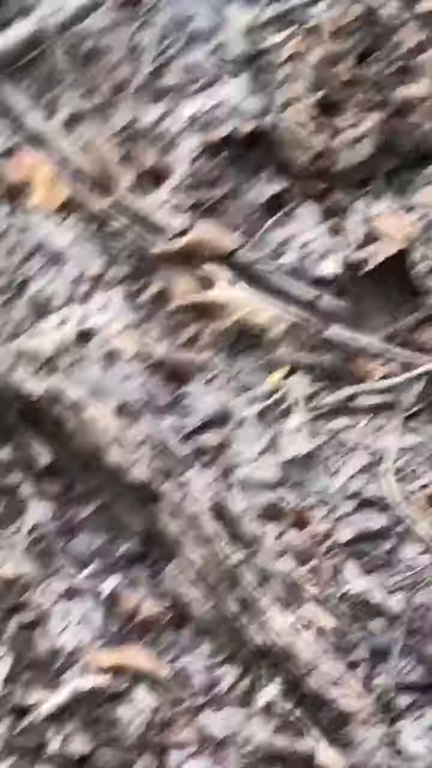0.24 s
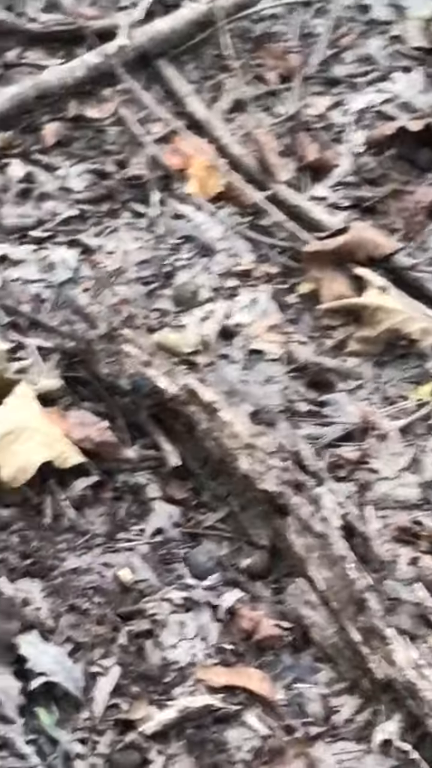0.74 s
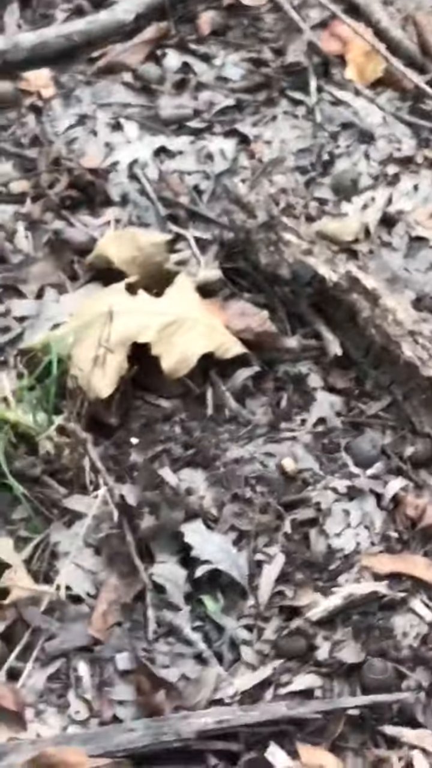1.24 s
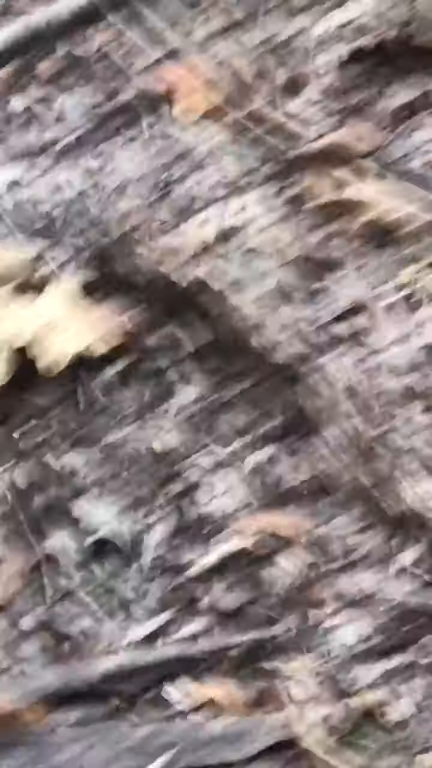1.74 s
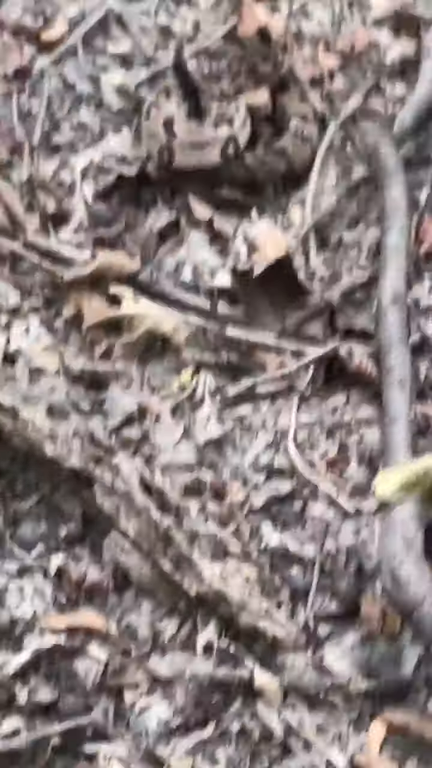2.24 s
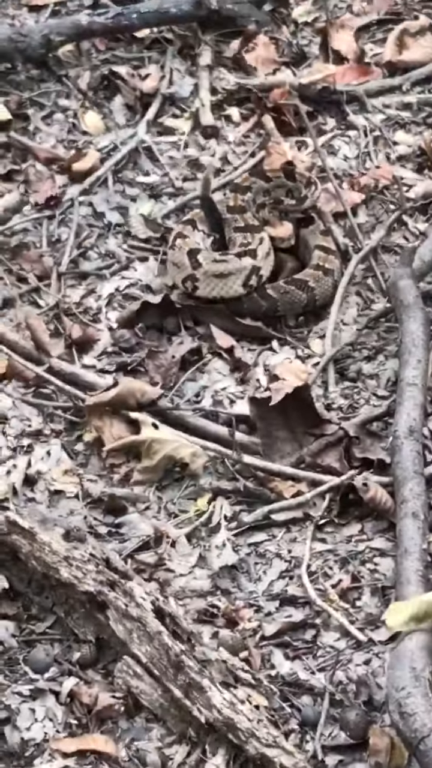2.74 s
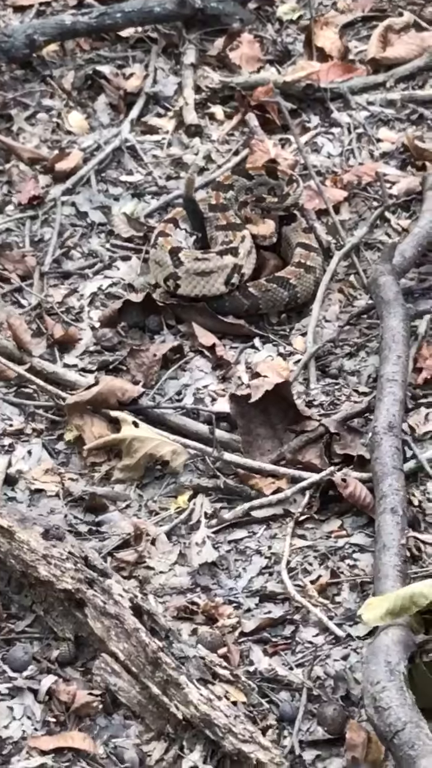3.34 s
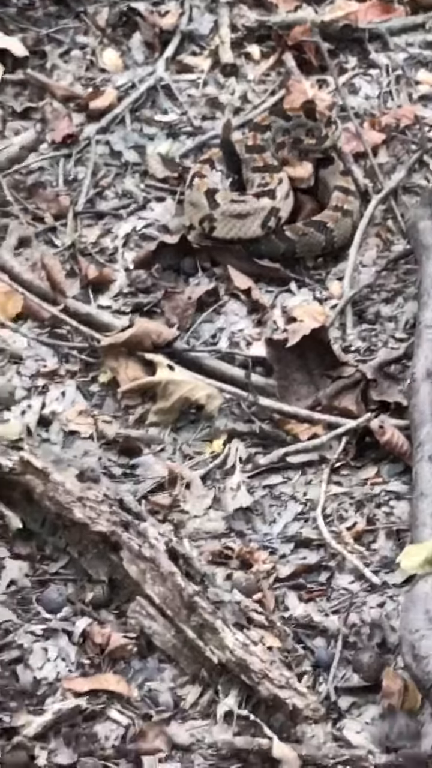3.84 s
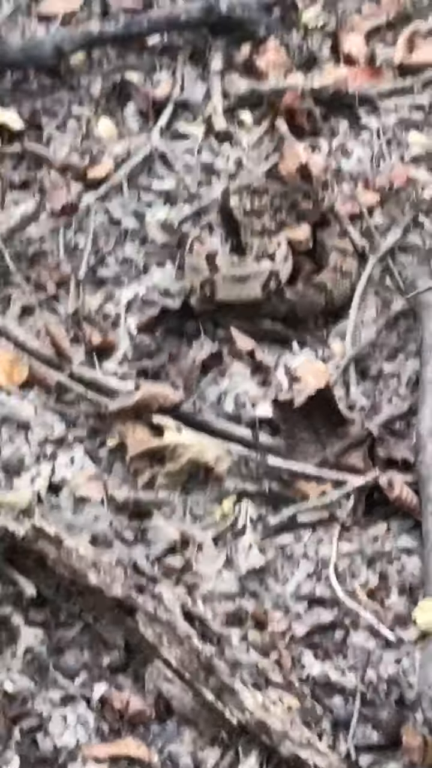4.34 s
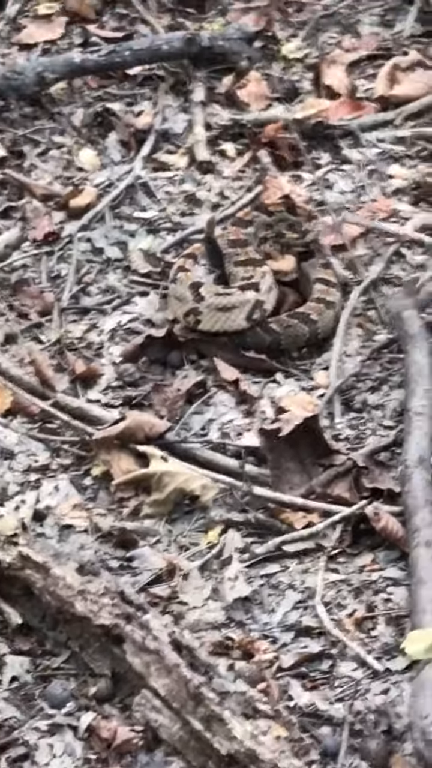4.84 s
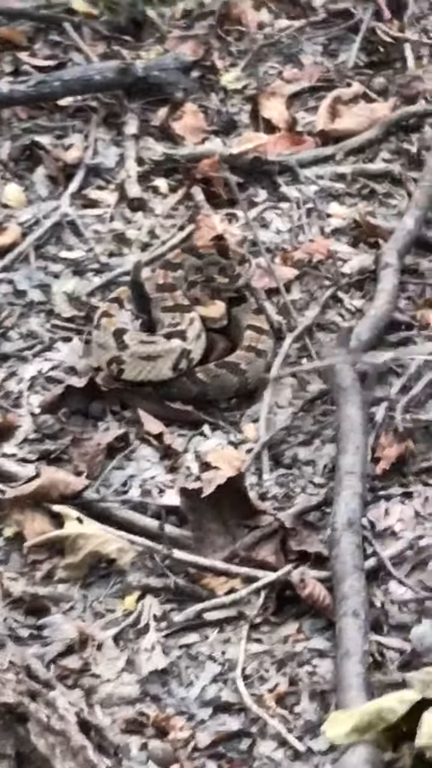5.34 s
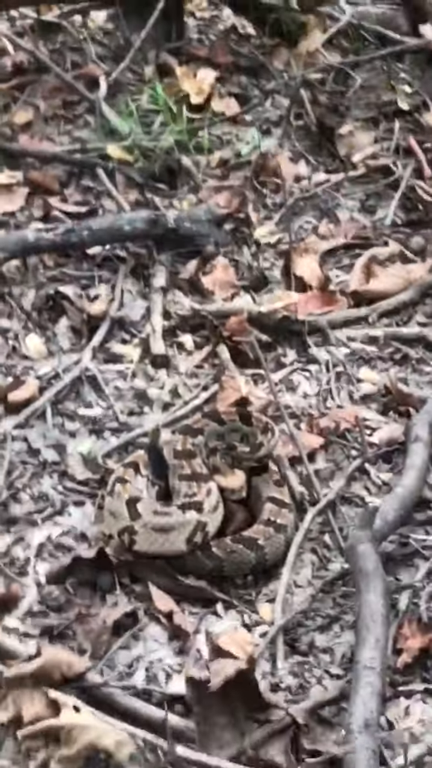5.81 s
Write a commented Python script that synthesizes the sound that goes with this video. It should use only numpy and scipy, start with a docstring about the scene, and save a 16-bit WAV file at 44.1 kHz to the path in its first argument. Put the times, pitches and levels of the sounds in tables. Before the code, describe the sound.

Crisp leaf litter snaps and scrapes underfoot, a single sizzling rattlesnake buzz swells and dies, and crunching footfalls return over faint insects.

```python
"""At first dry leaves and twigs snap, scrape and rustle close by: impulses ring in leaf, wood and soil.
From 1.2 to 3.4 s a coiled rattlesnake buzzes once: hollow tail segments, knocked at each swing, resonate.
Duller crunches and knocks accompany the buzz; sparse rustling follows, then denser snapping to the end.
Throughout, filtered noise makes a low rumble, wavering low tones and a far, narrow-band insect chorus."""
import sys
import numpy as np
from scipy import signal
from scipy.fft import rfft, irfft
from scipy.io import wavfile
from scipy.ndimage import uniform_filter1d

SR = 44100
rng = np.random.default_rng(int(sys.argv[2]) if len(sys.argv) > 2 else 0)


def digitize_waveform(pressure):
    """Quantize a signal to 16-bit integers and store it at the path in sys.argv[1].

    Rows of a 2-D input are taken as channels; values are limited to [-1, 1].
    """
    field = np.atleast_2d(pressure).T
    bounded = np.clip(field, -1, 1)
    quanta = np.round(bounded * 32767).astype(np.int16)
    wavfile.write(sys.argv[1], SR, quanta)


N = 267687   # samples

# Loudness curve of the buzz. Columns: time_s, level_db
BUZZ_LEVEL = [(1.2, -75), (1.27, -43.5), (1.37, -34.5), (1.88, -30.5), (2.68, -32.5), (3.19, -38),
              (3.36, -49.5), (3.4, -86)]
# Rate of tail swings, one each way. Columns: time_s, swings_per_s
TAIL_SWINGS = [(1.2, 160), (1.5, 150), (2.3, 145), (3.4, 107)]
# Segment resonances. Columns: pitch_hz, width_hz, bunching_depth (0-1),
# facing_db (gain before the root-width weight), facing_s (moment of facing the listener)
SEGMENTS = [(3310, 470, 0.3, -3.5, 2.98), (4280, 560, 0.5, -3, 1.08), (4700, 370, 0.8, -5.5, 2.93),
            (5540, 420, 0.46, 0, 2.1), (6200, 480, 0.8, 3, 3.27), (7040, 560, 1, 1.5, 2.19),
            (7520, 450, .9, -1, 2.3), (8250, 280, 0.63, 0.5, 2.9), (8800, 1200, 0.4, -3.5, 2.34),
            (9440, 320, 0, -3.5, 2.1), (9970, 550, 0.4, -3.5, 2.9), (11100, 480, 0, -11, 2.6),
            (12400, 710, 0.3, -4, 2.6), (14200, 2000, 0.2, -8, 2.73), (14900, 1500, .4, -8, 2.44)]
# Leaves and twigs breaking. Columns: break_s, snap_peak_db, snap_hz, treble_peak_db, knock_peak_db, knock_hz
CRACKS = [(0.02, -34.5, 4200, -46, -43, 1670), (0.0785, -23, 3100, -41, -33, 1550),
          (0.0854, -33, 3500, -43, -30, 1900), (0.1136, -27, 3720, -38, -48, 1660),
          (0.192, -32, 5110, -37, -60, 1340), (0.207, -25, 4600, -31, -28.5, 1550),
          (0.2285, -13, 6260, -24, -21, 1820), (0.2489, -30, 5580, -48, -32, 1450),
          (0.2672, -29, 4870, -40, -60, 1640), (0.2783, -13.5, 5260, -11.5, -26.5, 1320),
          (0.289, -28, 3700, -48, -42, 1900), (0.296, -26, 4930, -30, -39, 1930),
          (0.31, -22, 2800, -15.5, -20, 1900), (0.353, -33, 6190, -43, -57, 1100),
          (0.3853, -30, 3900, -48, -60, 1240), (0.396, -28, 4250, -39, -29.5, 1670),
          (0.426, -32, 3250, -46, -37, 1380), (0.46, -27.5, 3800, -24, -62, 1030),
          (0.5122, -32.5, 5000, -47, -39, 816), (0.559, -36, 6070, -45, -58, 1540),
          (0.6083, -36, 4360, -41, -47, 1520), (0.628, -32.5, 3850, -29.5, -42, 1460),
          (0.646, -29.5, 5100, -41, -55, 1420), (0.7142, -36.5, 6200, -41, -46, 1930),
          (0.828, -32, 3150, -27.5, -33.5, 1110), (0.8432, -35.5, 4560, -53, -42, 1750),
          (0.96, -38, 3600, -36, -49, 2200), (0.982, -42, 4720, -50, -62, 1100),
          (1.0256, -31, 5970, -37, -53, 1360), (1.0448, -21, 5050, -34, -29, 2260),
          (1.08, -21, 4800, -15.5, -28.5, 1520), (1.1025, -27.5, 5230, -43, -30, 1700),
          (1.1238, -32, 5930, -43, -31.5, 2260), (1.143, -28, 3400, -44, -29.5, 820),
          (1.1623, -23, 4440, -40, -25.5, 1550), (1.178, -20, 5300, -20.5, -54, 1870),
          (1.2024, -34, 3740, -43, -63, 1440), (1.2207, -31, 5500, -37, -44, 1960),
          (1.2349, -26.5, 4700, -39, -44, 1330), (1.2587, -21, 5800, -36, -53, 1790),
          (1.282, -27.5, 2800, -49, -52, 2410), (1.3852, -16, 4550, -45, -59, 2240),
          (1.6304, -39, 2980, -56, -31, 655), (1.6791, -23.5, 3000, -47, -24, 920),
          (1.7838, -42, 3000, -57, -36, 1100), (1.8285, -48, 3010, -58, -36, 1050),
          (1.8666, -29, 3020, -44, -24.5, 870), (2.0326, -55, 3000, -61, -37, 1690),
          (2.069, -47, 3000, -57, -33, 915), (2.1196, -40, 3000, -48, -27, 1420),
          (2.2795, -48, 3000, -58, -36, 1330), (2.332, -9.5, 4274, -32, -58, 2070),
          (2.3392, -50, 3000, -60, -32, 1280), (3.0768, -53, 3000, -63, -40, 1050),
          (3.1596, -53, 3000, -63, -42, 820), (3.2882, -40, 4580, -30, -36, 1260),
          (3.4717, -48, 4850, -64, -65, 1090), (3.5179, -44, 5700, -60, -65, 740),
          (3.606, -61, 2800, -66, -52, 1500), (3.537, -46, 6060, -59, -56, 830),
          (4.1466, -38, 5220, -48, -60, 1240), (4.1742, -35, 4060, -43, -40, 1690),
          (4.2077, -31, 4500, -46, -58, 2380), (4.2445, -44, 6220, -56, -59, 590),
          (4.3642, -36, 6330, -51, -65, 1850), (4.374, -39, 5050, -31.5, -44.5, 1620),
          (4.503, -42.5, 5030, -55, -53.5, 1220), (4.784, -46, 5800, -56, -65, 1200),
          (4.826, -43, 5000, -38, -58, 800), (4.8384, -39, 4100, -39, -43, 1580),
          (4.8987, -30, 6100, -47, -65, 1090), (5.021, -32, 6320, -57, -62, 1510),
          (5.192, -28, 5600, -42, -35.5, 1440), (5.2011, -28.5, 3300, -40, -31, 2260),
          (5.2533, -50, 5060, -50, -38.5, 1180), (5.277, -38, 5300, -43, -52, 1890),
          (5.3, -32, 4250, -42, -49, 1590), (5.3103, -29.5, 4300, -54, -60, 1850),
          (5.354, -25.5, 2730, -37, -27.5, 1500), (5.405, -30, 2740, -46, -48, 2290),
          (5.4168, -26, 4900, -42, -51, 1990), (5.5238, -21, 5100, -37, -22, 1420),
          (5.5998, -27.5, 4540, -24.5, -32, 1630), (5.6232, -29.5, 3870, -25, -47, 2230),
          (5.64, -44, 3710, -46, -33.5, 1390), (5.684, -22.5, 5330, -46, -31.5, 1520),
          (5.709, -38, 4780, -41, -45, 1430), (5.7922, -27.5, 4500, -26, -36, 2130),
          (5.804, -41, 3600, -37, -49, 1950), (5.8248, -37, 2800, -52, -23, 2250),
          (5.8307, -30, 2800, -49, -22, 2270), (5.847, -40, 3300, -37, -29, 1630),
          (5.89, -49, 3600, -55, -34.5, 1190), (5.911, -38, 4010, -30, -60, 2280),
          (6.0124, -34.5, 3280, -34, -33, 1630)]
# Leaves crushed or dragged; levels are rms before the envelope.
# Columns: start_s, hold_s, body_db, body_hz, treble_db, low_db
SCUFFS = [(.018, 0.01, -50, 3960, -51, -65), (.073, 0.032, -40.5, 3230, -38.5, -50),
          (.11, .027, -45, 3500, -53, -49.5), (.168, 0.033, -59, 6500, -46.5, -57.5),
          (.205, 0.017, -50, 4200, -37.5, -47.5), (.29, 0.0022, -64, 3980, -49, -54),
          (1.035, 0.012, -60, 4500, -45.5, -69), (1.275, 0.0088, -43.5, 2700, -46, -54),
          (2.262, 0.04, -50.5, 1530, -64, -51.5), (2.328, 0.033, -52, 1810, -62, -49.5),
          (2.725, 0.003, -68, 696, -75, -61), (3.748, 0.015, -71, 6500, -65.5, -68),
          (3.96, 0.1, -73, 5500, -63.5, -85), (4.15, .035, -54, 5500, -71, -68),
          (4.2, 0.015, -57, 4430, -52, -61), (4.369, 0.0039, -67, 4000, -57, -76),
          (4.824, 0.0065, -79, 5000, -54, -73), (4.897, .012, -48, 4100, -67, -63),
          (5.188, .016, -52, 3500, -45, -53), (5.402, 0.027, -45.5, 3500, -62, -78),
          (5.495, .033, -47, 3000, -56, -58), (5.819, 0.012, -34.5, 2330, -71, -43),
          (5.842, 0.025, -45.5, 2420, -43, -56), (5.885, 0.03, -52, 2970, -49.5, -57)]
# Feet in the litter, as gain curves. Columns: time_s, rustle_db, crunch_db, treble_db (added to the rustle)
LITTER_LEVELS = [(0.0, -56, -66, 7), (0.114, -47.5, -53, 3), (0.496, -52, -55.5, 8.5),
                 (0.63, -62.5, -64, 10), (0.936, -65, -66.5, 7), (1.082, -54.5, -61, 3),
                 (1.22, -47, -54.5, 6), (1.65, -56, -50.5, -12), (2.25, -52, -55.5, -11),
                 (2.83, -58, -64.5, -9), (3.3, -61, -67, -5), (3.49, -74, -77.5, 6), (4.01, -75, -74, 4),
                 (4.2, -55, -64.5, 4.5), (4.47, -73, -75.5, 4.5), (4.9, -59, -64, 2),
                 (5.12, -49.5, -57.5, 3.5), (5.4, -52, -56, 8.5), (5.74, -52.5, -60, 2.5),
                 (5.91, -57, -57, 10), (6.07, -55.5, -61.5, 5)]
# Relative spectrum of the rustle. Columns: frequency_hz, gain_db
RUSTLE_SPECTRUM = [(1200, -22), (2000, -29), (3000, 4), (4500, 6.5), (7000, 4.5), (11000, -2), (16000, -1)]
# Relative spectrum of the dull crunch. Columns: frequency_hz, density_db (per Hz)
CRUNCH_SPECTRUM = [(200, 0.5), (500, 0.5), (1000, 1), (2000, 2.5), (3200, 2.5), (6000, -35)]
# A foot's weight on the soil. Columns: impact_s, peak_db
THUDS = [(0.0842, -42), (0.2297, -36), (.25, -43), (.31, -38), (1.2349, -49), (1.6304, -40),
         (1.6796, -35.5), (1.8284, -57), (2.1201, -47), (2.271, -44.5), (5.192, -46), (5.3548, -51),
         (5.5237, -45), (5.6002, -49), (5.684, -48), (5.8263, -39), (5.89, -52)]
# Relative spectrum of rumble and air. Columns: frequency_hz, density_db (per Hz)
AIR_SPECTRUM = [(12, -32), (20, -25), (59, 7), (98, 0.5), (158, -9.5), (208, -5.5), (354, -10),
                (430, -15.5), (1280, -25.5), (3000, -39), (6000, -39), (10000, -42), (15700, -26.5)]
# Low tones. Columns: pitch_hz, width_hz, level_db (before the swell)
LOW_TONES = [(71.6, 25, -62), (115, 7, -65), (194.3, 15.6, -69.5)]
# Wavering of the low tones. Columns: time_s, gain_db
LOW_TONE_SWELL = [(0, 4.5), (1.2, -4.5), (1.6, 4), (3.3, -1), (6.07, -1.5)]
# Swell of the insect chorus. Columns: time_s, gain_db
INSECT_SWELL = [(0, 3), (1, -4), (4.1, -1), (6.07, 0)]

TURNED_AWAY_DB, TURN_S = -9, 1   # loss of a segment turned away; time scale of its facing
CREAK_S = 0.0022   # a break creaks this long before it goes
SPRAY_DB, SPRAY_SPREAD_DB = -17, 1   # spray relative to the break; its spread from crack to crack
BREAK_T60_S = 0.011
SNAP_WIDTH, TICK_WIDTH = 0.36, 0.3   # resonance widths as shares of the pitch
SCUFF_RISE_S, SCUFF_T60_S = 0.0031, 0.099
AIR_DB = -59
INSECT_DB = -65   # before swell and shimmer
INSECT_LOW_HZ, INSECT_TOP_HZ = 7600, 8520
CUTOFF_HZ = 15720


def amp(db):
    """Decibel law: 20 dB is a factor of ten in amplitude."""
    return 10 ** (np.asarray(db) / 20)


def rms_one(x):
    """Normalisation to unit root-mean-square amplitude."""
    return x / np.sqrt(np.mean(x ** 2) + 1e-20)


def in_time(rows, outside=None):
    """Linear interpolation of each curve column, sample by sample."""
    s, *columns = np.transpose(rows)
    return [np.interp(np.arange(N) / SR, s, c, outside, outside) for c in columns]


def drift(rate_hz):
    """Low-passed noise: a slow random fluctuation of about unit spread."""
    step = 40   # samples between drawn values
    r = np.exp(-2 * np.pi * rate_hz * step / SR)
    noise = rng.standard_normal(N // step + 2002)
    slow = signal.lfilter([1], [1, -2 * r, r * r], noise)[2000:]   # drop the filter's start
    return np.interp(np.arange(N) / step, np.arange(len(slow)), rms_one(slow - slow.mean()))


def resonate(x, hz, width_hz):
    """Two-pole resonance of unit gain at its peak; the pole radius sets the damping."""
    r = np.exp(-np.pi * width_hz / SR)
    feedback = [1, -2 * r * np.cos(2 * np.pi * hz / SR), r * r]
    return signal.lfilter([(1 - r * r) / 2, 0, (r * r - 1) / 2], feedback, x)


def colour(x, spectrum):
    """Spectral shaping in the frequency domain, interpolated over log frequency; unit rms."""
    hz = np.maximum(np.arange(N // 2 + 1) * SR / N, 1)
    table_hz, table_db = np.array(spectrum).T
    gain_db = np.interp(np.log(hz), np.log(table_hz), table_db)
    return rms_one(irfft(rfft(x) * amp(gain_db), N))


def clicks(per_s, spread_db):
    """Poisson-like impulses: chance per sample sets the rate; size and sign are random."""
    chance, out = rng.random((2, N)), np.full(N, 1e-18)
    hit = chance[0] < per_s / SR
    luck = 2 * chance[1, hit] - 1
    size = np.minimum(-np.log(np.abs(luck) + 1e-9), 4)   # capped exponential spread
    out[hit] = np.sign(luck) * amp(spread_db * size)
    return out


def burst(spray_db):
    """Fracture: a short rising creak, one sharp break, then an exponentially decaying uneven spray."""
    s = np.arange(1536) / SR - CREAK_S
    spray = rng.standard_normal(1536) * rng.exponential(0.55, 1536)
    decay = np.where(s > 0, s / BREAK_T60_S, -s / 0.01)
    spray *= amp(spray_db - 60 * decay)
    spray[np.argmin(np.abs(s))] = 1   # the break itself
    return spray


def add(out, s, sound, peak_db):
    """Superposition of a short sound scaled to its peak level."""
    at = round(s * SR)
    scaled = amp(peak_db) * sound / np.abs(sound).max()
    out[at:at + len(sound)] += scaled[:N - at]


def rattle():
    """Impact-excited resonators: swings bunch the knocks, and each segment's aspect sets its level."""
    sounding = in_time([(BUZZ_LEVEL[0][0], 1), (BUZZ_LEVEL[-1][0], 1)], 0)[0]
    swing = 2 * np.pi * np.cumsum(in_time(TAIL_SWINGS)[0]) / SR   # phase in radians
    # hard knocks shake the whole string of segments
    shared = rms_one(clicks(1500 * np.exp(0.95 * np.cos(swing)), spread_db=-4))
    out, t = 0, np.arange(N) / SR
    for k, (hz, width_hz, depth, facing_db, facing_s) in enumerate(SEGMENTS):
        turn = swing + 0.6 * drift(2.7)   # each segment's timing wanders
        pulse = 0.61 * np.cos(turn) + 0.67 * np.cos(2 * turn) + 0.3 * np.cos(turn / 2 + k)
        bunch = np.exp(depth * pulse)
        knocks = rms_one(clicks(4000 * bunch, spread_db=4.5)) + 0.072 * shared
        away = 1 - np.exp(-((t - facing_s) / TURN_S) ** 2)
        gain_db = facing_db + TURNED_AWAY_DB * away + 1.37 * drift(6.0)
        ring = rms_one(resonate(knocks, hz, width_hz)) * np.sqrt(width_hz)
        out = out + (-1) ** k * amp(gain_db) * ring
    # too small to radiate lows
    out = signal.sosfilt(signal.butter(6, 2800, "high", fs=SR, output="sos"), out)
    loudness = np.sqrt(uniform_filter1d(out ** 2, size=16384))
    return sounding * amp(in_time(BUZZ_LEVEL)[0]) * out / loudness


def breaks():
    """One fracture excites three registers: bright leaf snap, its treble and a woody knock."""
    out = np.zeros(N)
    treble = signal.butter(2, [6500, 13000], "band", fs=SR, output="sos")
    for s, snap_db, snap_hz, treble_db, knock_db, knock_hz in CRACKS:
        crack = burst(SPRAY_DB + SPRAY_SPREAD_DB * rng.standard_normal())
        snap = resonate(crack, snap_hz, SNAP_WIDTH * snap_hz)
        snap = resonate(snap, snap_hz, 2.0 * snap_hz)
        knock = resonate(crack, knock_hz, 0.93 * knock_hz)
        knock = resonate(knock, 0.4 * knock_hz, 1.32 * knock_hz)
        add(out, s - CREAK_S, snap, snap_db)
        add(out, s - CREAK_S, signal.sosfilt(treble, crack), treble_db)
        add(out, s - CREAK_S, knock, knock_db)
    return out


def scuffs():
    """Friction as dense uneven impulses, in three registers under a rise, hold and decay."""
    size = 8192
    out, t = np.zeros(N), np.arange(size) / SR
    crackle = rms_one(clicks(3500 * amp(4.0 * drift(120)), spread_db=3.0))
    for k, (s, hold, body_db, hz, treble_db, low_db) in enumerate(SCUFFS):
        grains = crackle[k * size:(k + 1) * size]
        body = rms_one(resonate(resonate(grains, hz, 0.7 * hz), hz, 2.1 * hz))
        treble = rms_one(resonate(grains, 7200, 15000))
        low = rms_one(resonate(resonate(grains, 480, 1500), 490, 1770))
        sound = amp(body_db) * body + amp(treble_db) * treble + amp(low_db) * low
        rise = np.clip(t / SCUFF_RISE_S, 0, 1) ** 2
        decay = amp(-60 * np.maximum(t - SCUFF_RISE_S - hold, 0) / SCUFF_T60_S)
        at = round(s * SR)
        out[at:at + size] += (sound * rise * decay)[:N - at]
    return out


def litter():
    """Granular friction: leaves rub and crackle in bands by leaf size, each swelling on its own."""
    rustle_db, crunch_db, treble_db = in_time(LITTER_LEVELS)
    clump, rustle = drift(20), 0   # clump: activity shared by all bands
    for k, hz in enumerate(np.geomspace(2300, 14500, 9)):
        grains = rms_one(clicks(1000 * amp(3 * clump), spread_db=3.0)) + 0.87 * rng.standard_normal(N)
        swell_db = clump + 3.2 * drift(30)
        gain_db = swell_db + treble_db * np.clip(np.log2(hz / 6000), 0, 1)
        rustle = rustle + (-1) ** k * amp(gain_db) * resonate(grains, hz, 0.38 * hz)
    crunch = colour(clicks(1500 * amp(4 * clump), spread_db=1.0), CRUNCH_SPECTRUM)
    ticks = 0   # small stems snap in several pitch bands
    for hz in np.geomspace(2000, 9000, 8):
        stems = clicks(45 * amp(5.2 * clump), spread_db=3.5)
        ticks = ticks + resonate(stems, hz, TICK_WIDTH * hz) / np.sqrt(hz)
    bright = colour(rustle, RUSTLE_SPECTRUM) + 0.54 * rms_one(ticks)
    return amp(rustle_db) * bright + amp(crunch_db) * crunch


def thuds():
    """Impulse response of soil: a break-like burst excites two broad low resonances."""
    out = np.zeros(N)
    for s, peak_db in THUDS:
        thud = resonate(resonate(burst(SPRAY_DB), 330, 240), 363, 370)
        add(out, s - CREAK_S, thud, peak_db)
    return out


def rumble():
    """Coloured noise for far rumble and air; narrow resonances of noise for the low tones."""
    out = amp(AIR_DB) * colour(rng.standard_normal(N), AIR_SPECTRUM)
    swell_db = in_time(LOW_TONE_SWELL)[0]
    for hz, width_hz, level_db in LOW_TONES:
        out += amp(level_db + swell_db) * rms_one(resonate(rng.standard_normal(N), hz, width_hz))
    return out


def insects():
    """Band-limited noise: many voices merge into a shimmering band with a sharp upper edge."""
    chorus = resonate(rng.standard_normal(N), 8320, 590)
    chorus = signal.sosfilt(signal.butter(2, INSECT_LOW_HZ, "high", fs=SR, output="sos"), chorus)
    chorus = signal.sosfilt(signal.ellip(8, 1, 40, INSECT_TOP_HZ, fs=SR, output="sos"), chorus)
    shimmer_db = 1.3 * drift(14)
    return amp(INSECT_DB + in_time(INSECT_SWELL)[0] + shimmer_db) * rms_one(chorus)


def scene():
    """Linear superposition of the near sources and the forest background, in one channel."""
    near = rattle() + breaks() + scuffs() + litter() + thuds()
    return (near + rumble() + insects())[None]


def record(dry):
    """Steep low-pass filtering: an elliptic filter cuts the top."""
    return signal.sosfilt(signal.ellip(13, 0.2, 70, CUTOFF_HZ, fs=SR, output="sos"), dry)


dry = scene()
out = record(dry)
digitize_waveform(out)
```